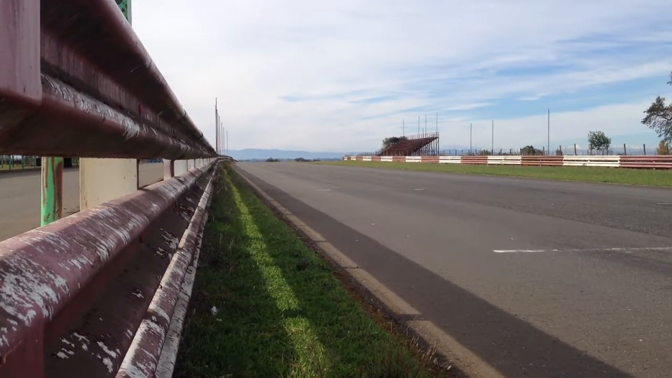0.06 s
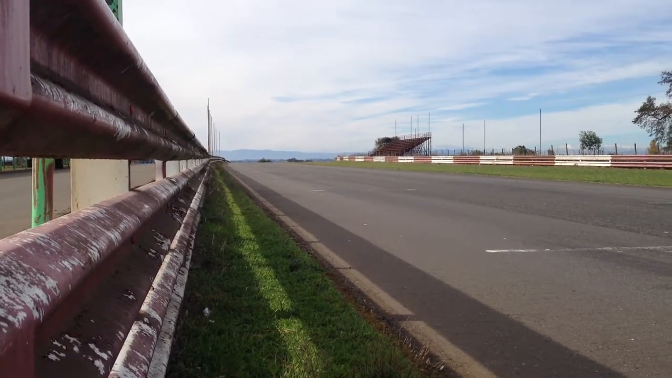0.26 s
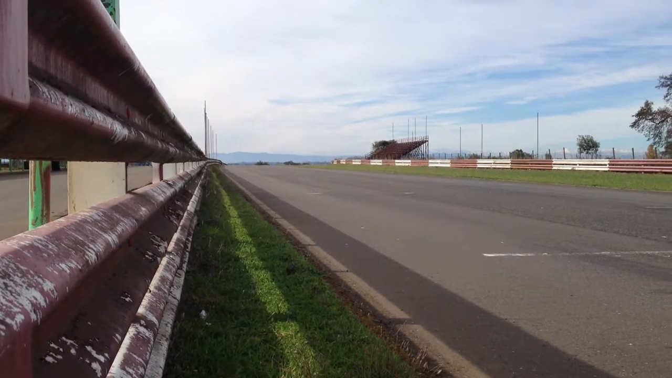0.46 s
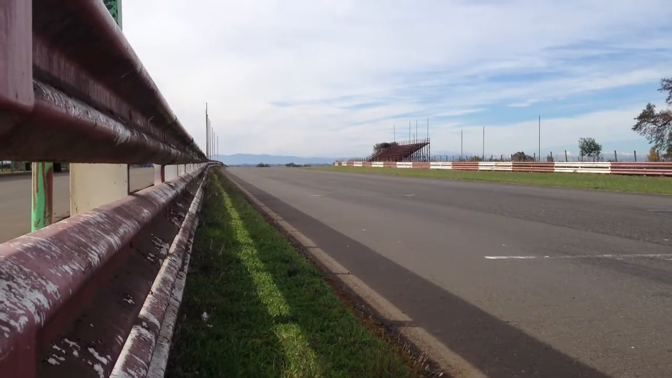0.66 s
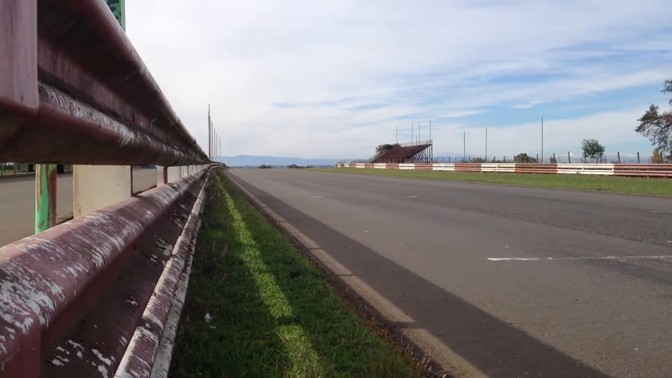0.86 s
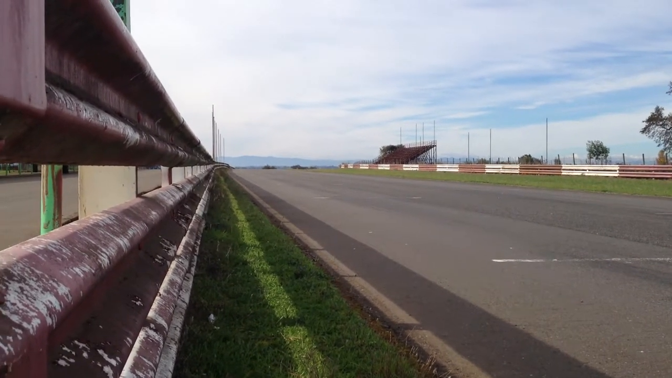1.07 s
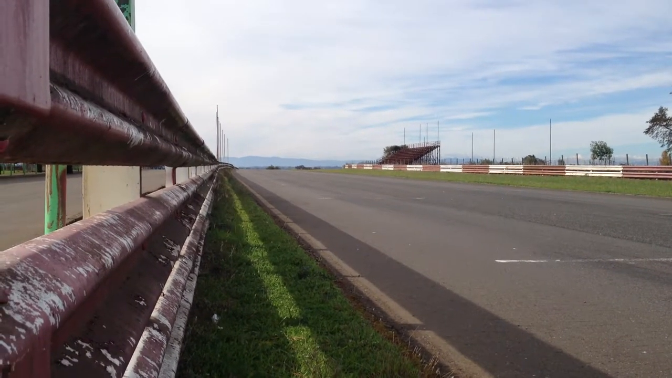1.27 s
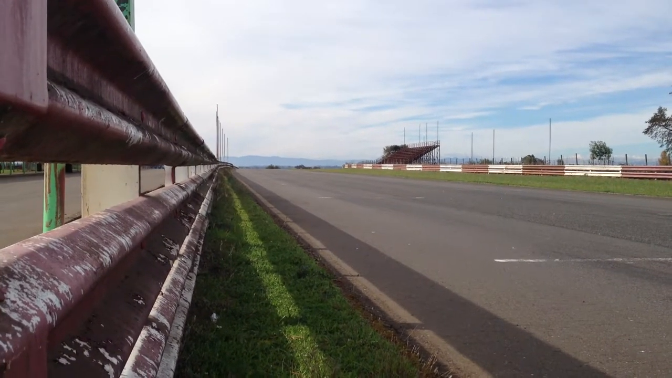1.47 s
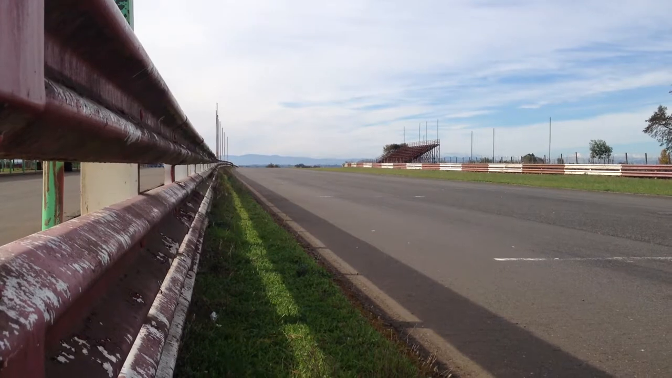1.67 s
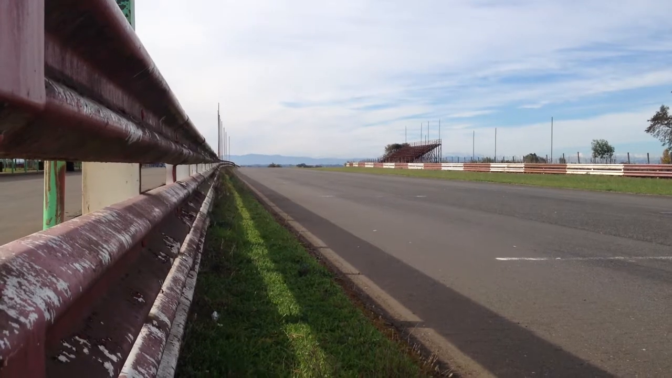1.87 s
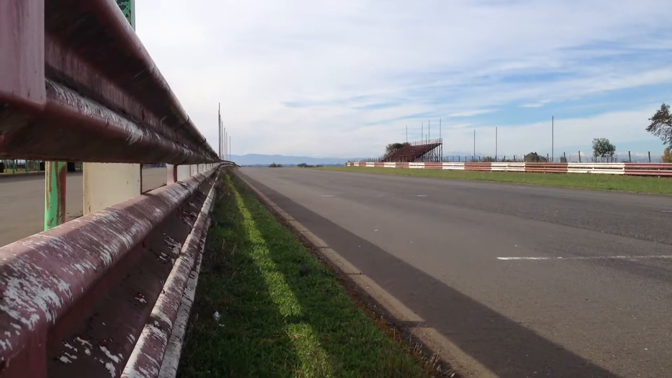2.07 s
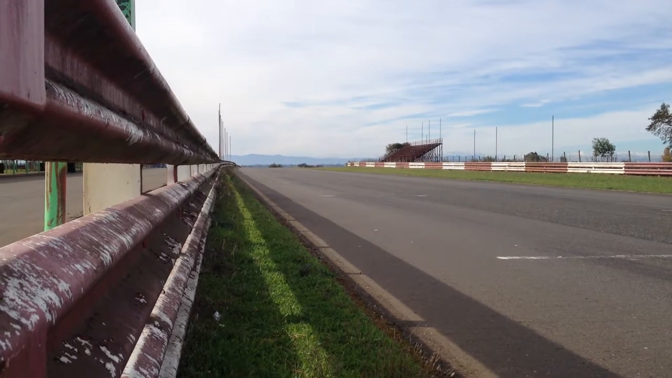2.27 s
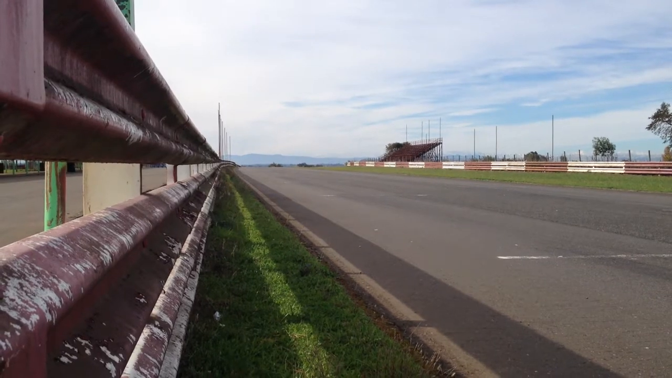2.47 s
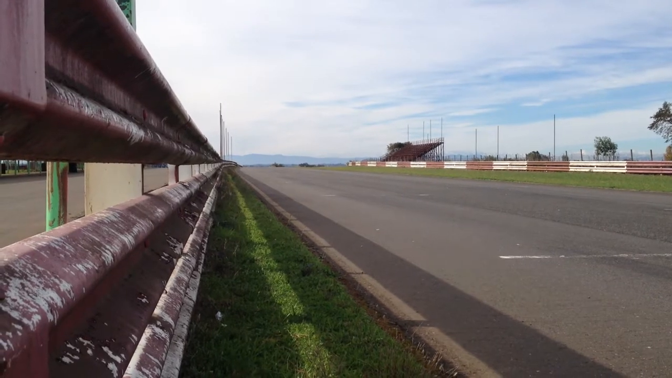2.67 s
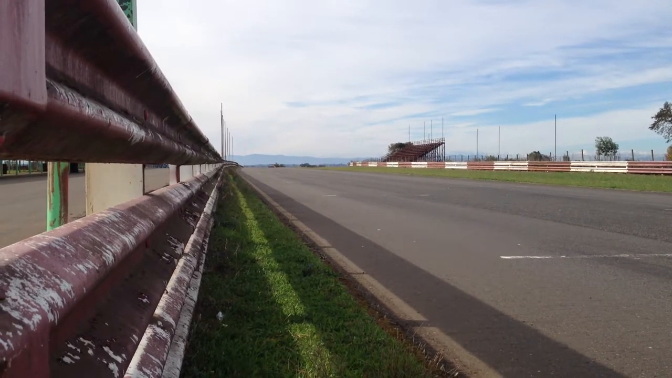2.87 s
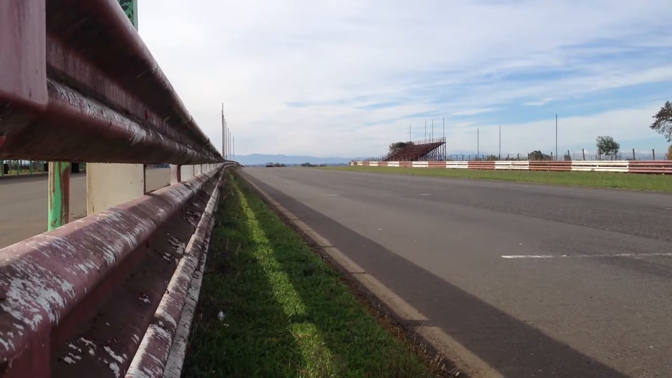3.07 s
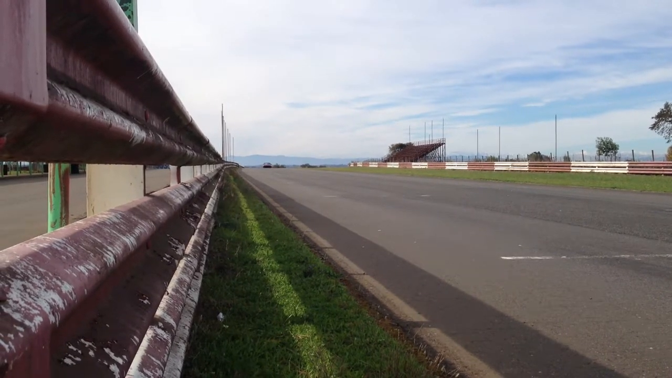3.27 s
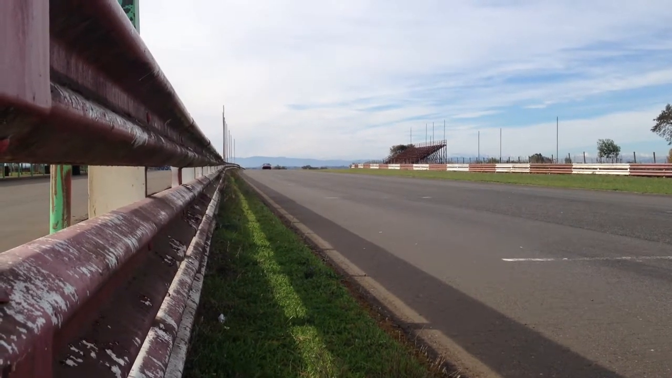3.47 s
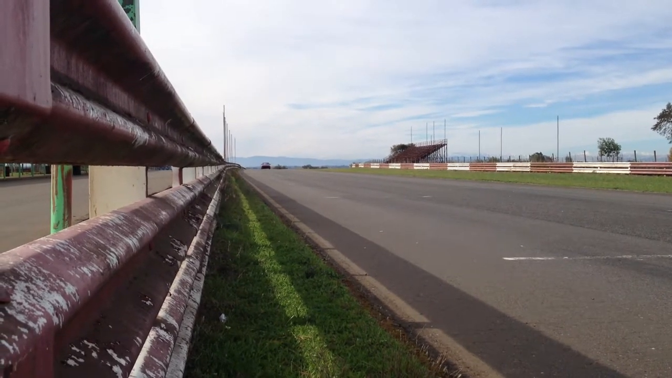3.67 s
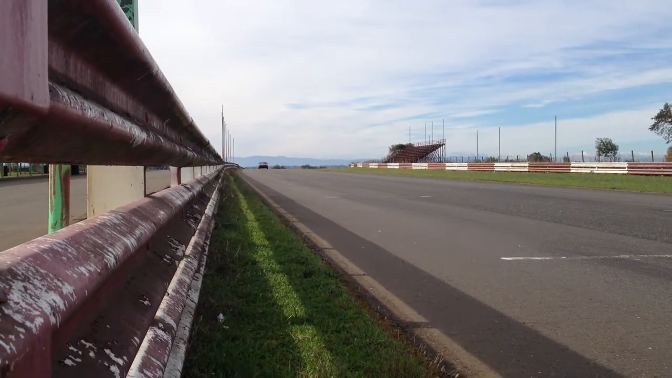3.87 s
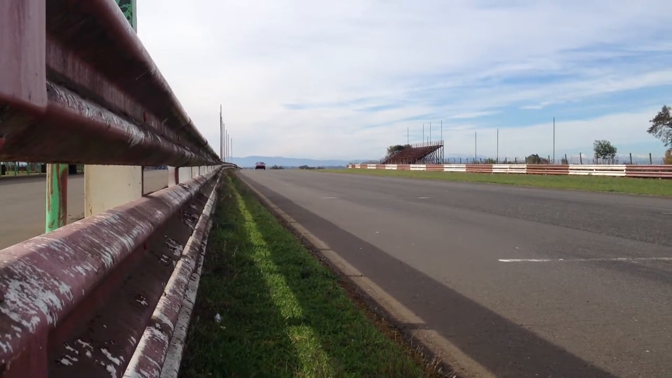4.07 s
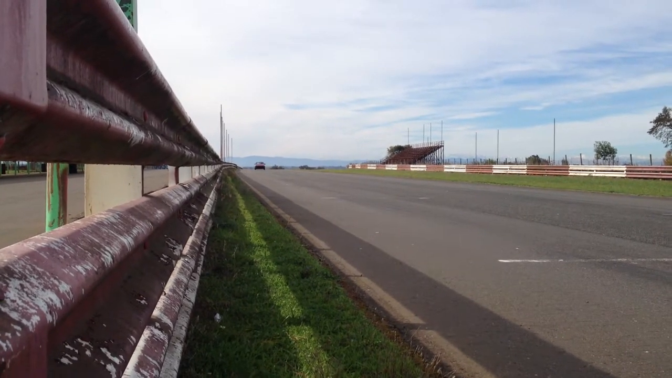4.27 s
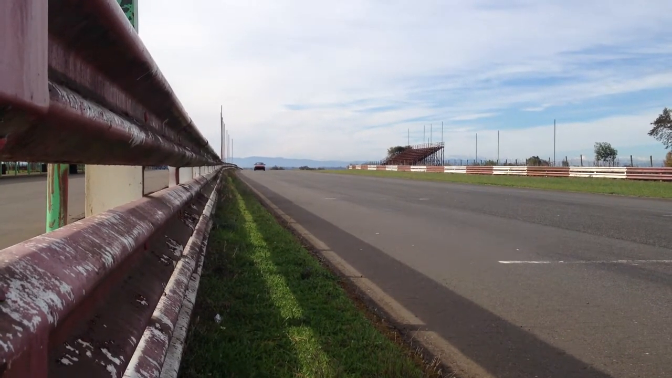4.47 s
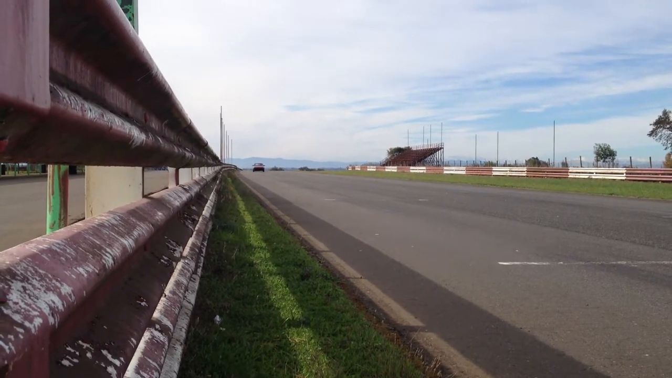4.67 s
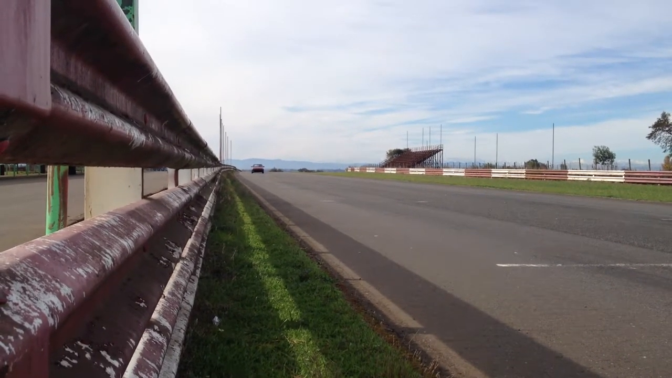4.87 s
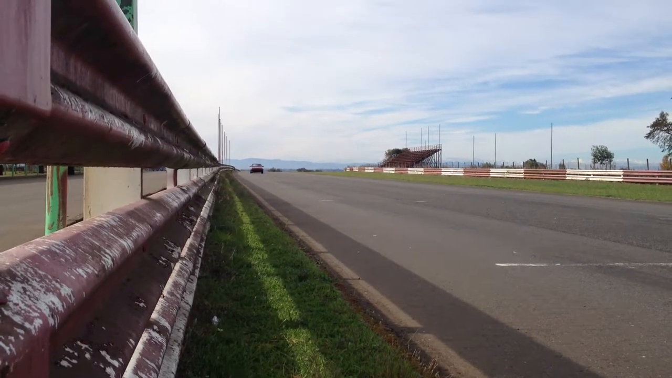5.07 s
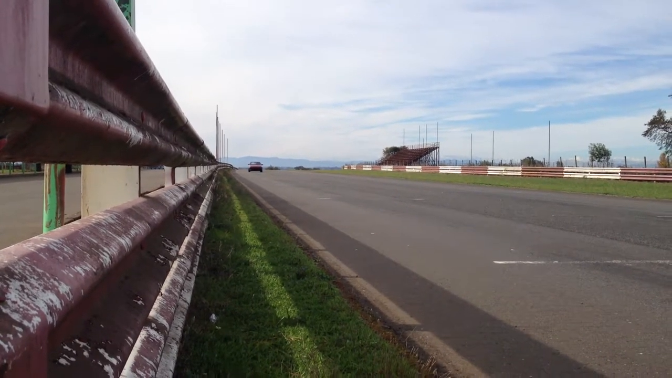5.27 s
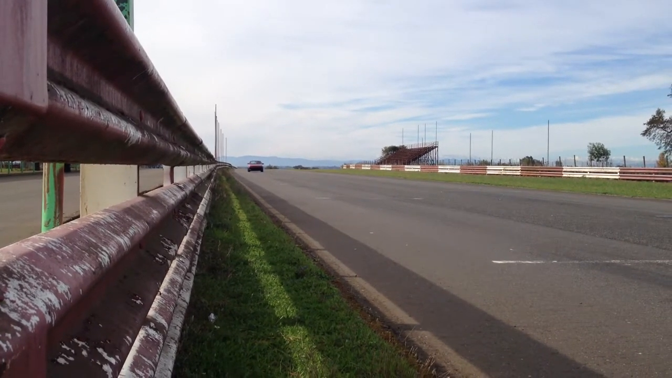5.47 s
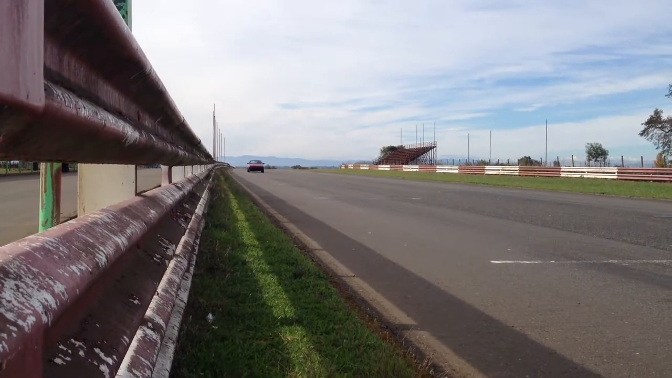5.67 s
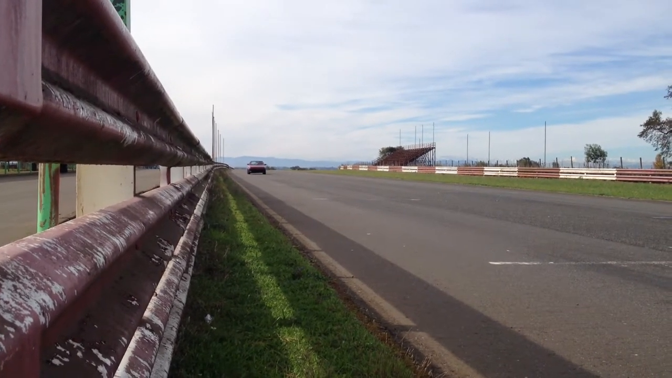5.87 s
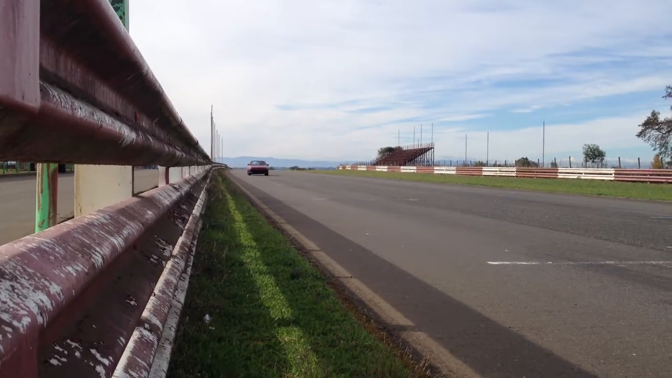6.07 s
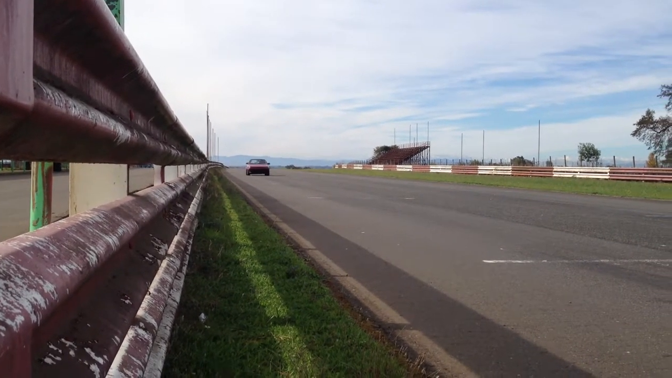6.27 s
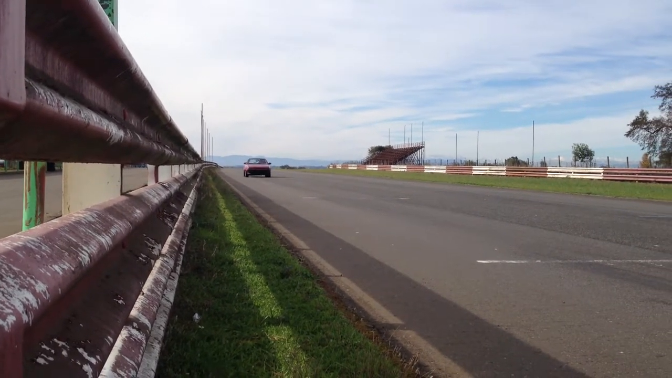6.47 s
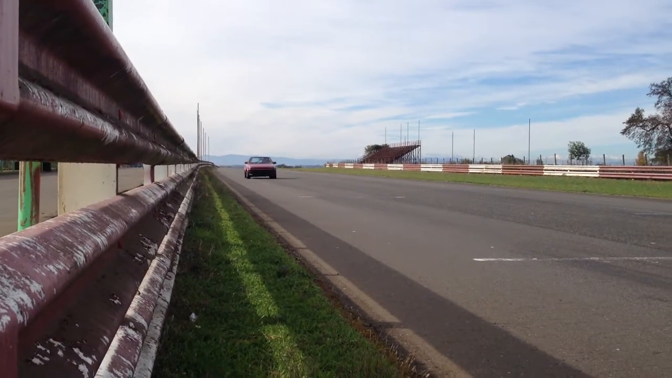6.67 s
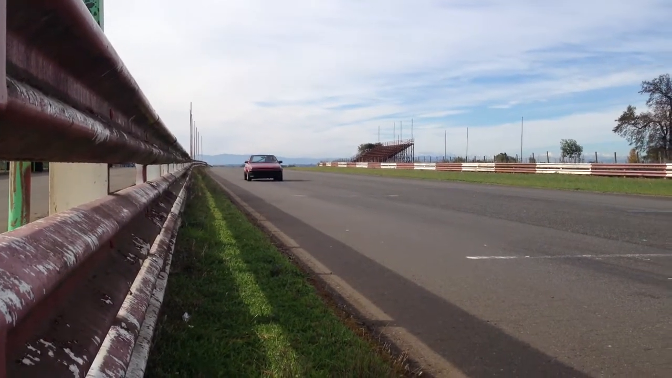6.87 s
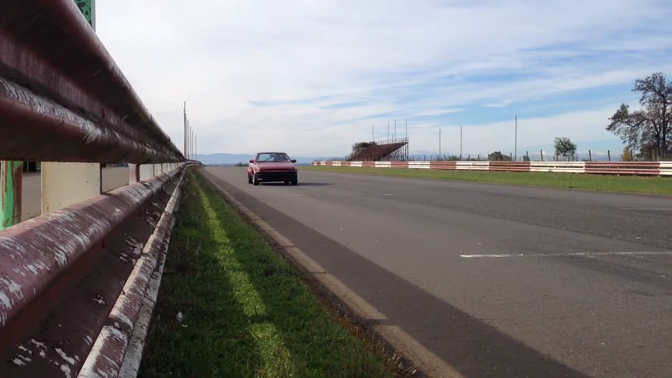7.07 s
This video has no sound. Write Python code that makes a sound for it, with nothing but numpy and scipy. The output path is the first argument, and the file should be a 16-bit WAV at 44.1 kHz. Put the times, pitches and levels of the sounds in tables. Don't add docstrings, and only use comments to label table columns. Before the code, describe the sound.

Outdoors beside a straight road, a small roadside camera picks up faint wind, distant traffic and light hiss. From 0 s a far four-cylinder engine is already at full throttle, a thin, buzzing drone wavering slightly around 0.6 s and rising in pitch. At about 1.9 s the throttle shuts: the tone thins and falls, with soft pops in the pipe, the strongest near 2.2 s. By 2.3 s power returns and the revs settle about a third lower by 2.5 s, with a faint last pop. From 2.6 s it pulls hard, rasping and ringing, pitch creeping upward. Between 3 and 5 s it swells steadily, with gas rush and whistling edges. From 5 to 7.1 s it grows much louder, throbbing unevenly with echoes, with brighter fizz. Dull microphone knocks come from 6.5 s, hardest near 7.1 s, ending still approaching, before any pass.

```python
import sys
import numpy as np
from scipy import signal
from scipy.fft import rfft, irfft, next_fast_len
from scipy.io import wavfile
from scipy.ndimage import uniform_filter1d, map_coordinates

SR = 44100
rng = np.random.default_rng(int(sys.argv[2]) if len(sys.argv) > 2 else 0)


def attenuation_scalar(level_db):
    decades = np.asarray(level_db, float) / 20
    return 10 ** decades


def transcribe(signal):
    frames = np.atleast_2d(signal).T
    limited = np.clip(frames, -1, 1)
    pcm = np.round(limited * 32767).astype(np.int16)
    wavfile.write(sys.argv[1], SR, pcm)


N = 314433

PASS_S = 8.11
SHUT_S, OPEN_S = 1.86, 2.26
# (time [s], firing order level [dB], bite of the exhaust [dB])
APPROACH = [(0, -40.5, -25.5), (.6, -41.5, -22), (1.0, -40, -23), (1.75, -39.5, -20.5), (2.3, -40.5, -18.5),
            (2.65, -38.5, -13.5), (3.0, -34.5, -16), (3.4, -33, -15.5), (4.0, -30.5, -16),
            (4.3, -30, -16.5), (4.7, -29, -16), (5.1, -26, -19), (5.5, -23.5, -18), (5.9, -20.5, -16),
            (6.3, -17.5, -16.5), (6.7, -14.5, -13.5), (7.0, -12, -12.5), (7.13, -11.5, -15)]


def unit(x):
    return x / np.sqrt(np.mean(x ** 2) + 1e-20)


def steady(x):
    power = uniform_filter1d(uniform_filter1d(x ** 2, SR // 6), SR // 6)
    return x / np.sqrt(np.abs(power) + 1e-20)


def curves(rows):
    s, *cols = np.transpose(rows)
    return [np.interp(np.arange(N) / SR, s, c) for c in cols]


def wobble(rate):
    coarse = np.arange(0, N + 32, 32)
    knots = rng.standard_normal(int(N * rate / SR) + 4)
    return np.interp(np.arange(N), coarse, map_coordinates(knots, [coarse * rate / SR]))


def wave(rad):
    return np.cos((rad - 2 * np.pi * np.floor(rad / (2 * np.pi))).astype(np.float32))


def coloured(x, points):
    m = next_fast_len(N + 8192)
    hz, db = np.transpose(points)
    gain = attenuation_scalar(np.interp(np.log(np.fft.rfftfreq(4096, 1 / SR) + 1), np.log(hz + 1), db))
    cepstrum = irfft(np.log(gain + 1e-5))
    cepstrum[1:2048] *= 2
    cepstrum[2049:] = 0
    impulse = irfft(np.exp(rfft(cepstrum)))
    return irfft(rfft(x, m) * rfft(impulse, m), m)[:N]


def resonant(x, modes, low_hz, high_hz, smear):
    m = next_fast_len(N + 8192)
    f = np.fft.rfftfreq(m, 1 / SR)
    power = sum(attenuation_scalar(2 * db) / (1 + (2 * (f - hz) / width) ** 2) for hz, width, db in modes)
    power /= (1 + (low_hz / (f + 1)) ** 24) * (1 + (f / high_hz) ** 40)
    bands = np.arange(0, SR, 130)
    delay = smear * np.interp(f, bands, rng.random(len(bands)))
    phase = -2 * np.pi * np.cumsum(delay) * f[1]
    return irfft(rfft(x, m) * np.sqrt(power) * np.exp(1j * phase), m)[:N]


def scintillate(x, patchy_db, wide, long):
    z = signal.stft(x, nperseg=1024, noverlap=512)[2]
    patches = rng.standard_normal(z.shape)
    for _ in range(2):
        patches = uniform_filter1d(uniform_filter1d(patches, wide, 0), long, 1)
    return signal.istft(z * attenuation_scalar(patchy_db * unit(patches)), nperseg=1024, noverlap=512)[1][:N]


def surge():
    start_s, length_s, period_s = .615, .42, .255
    t = np.arange(N) / SR - start_s
    return np.cos(2 * np.pi * t / period_s) * np.exp(-((t - .1) / length_s) ** 4 / 2)


def shade(revs):
    return np.where(np.arange(N) < SHUT_S * SR, np.maximum(revs, 65.5), revs)


def engine():
    # (time [s], cycle rate [Hz])
    cycle_rate = [(0, 63.4), (1.0, 67.84), (1.3, 68.65), (1.6, 69.84), (1.85, 70.96), (1.93, 66.76),
                  (2.06, 63.8), (2.18, 61.6), (2.27, 58.84), (2.36, 54.1), (2.43, 49.6), (2.5, 49),
                  (2.9, 50.1), (3.4, 51.5), (3.8, 52.95), (4.3, 54.24), (4.8, 56.4), (5.2, 57.55),
                  (5.6, 58.94), (5.85, 59.5), (6.2, 61.24), (6.6, 62.5), (7.13, 64.34)]
    revs = curves(cycle_rate)[0] + 1.5 * surge()
    return revs, np.cumsum(revs) / SR


def order_levels(revs, slow_db, loose):
    # (revs [Hz], order 3 [dB], order 5 [dB], order 8 [dB])
    side_orders = [(49, -17, -14, -16), (49.8, -18, -13.5, -15), (54.5, -10.5, -6, -17.5),
                   (56.7, -11, -8.5, -18), (59.5, -13.5, -8, -17), (61.5, -16, -12, -16),
                   (63.2, -19, -17.5, -16), (64.6, -16, -20.5, -23), (67.1, -10.5, -23, -13.5),
                   (74.6, -9, -15, -19)]
    # (revs [Hz], order 7 [dB], order 9 [dB], order 12 [dB], order 16 [dB])
    upper_orders = [(49, -17.5, -37, -31, -22), (51.4, -28, -43, -20.5, -19), (53.8, -25, -39, -23, -20.5),
                    (54.7, -17.5, -38, -17, -21.5), (56.3, -18, -33, -18, -27.5),
                    (58.3, -17, -26, -14.5, -20.5), (59.8, -20.5, -28, -14.5, -24),
                    (61.48, -19, -26.5, -22.5, -37), (63.75, -20, -21.5, -22.5, -28.5),
                    (65.3, -35, -38, -33, -39), (68.7, -24, -45, -40, -33), (69.2, -21, -40, -24, -32),
                    (68, -22.5, -40, -26, -31)]
    # (order [number], level under the firing order [dB])
    weak_orders = [(2, -39)]
    # (time [s], level [dB])
    throttle = [(1.79, 0.5), (1.86, -7.5), (1.92, -0.5), (2.07, -7.5), (2.15, 2.5), (2.19, -10),
                (2.22, 1.5), (2.25, -4.5), (2.28, 3), (2.46, 3), (2.49, -2), (2.52, 4), (2.56, 3)]
    # (time [s], level [dB])
    sway = [(4.9, -0.5), (5.25, -4), (5.4, -1.5), (5.6, -3.5), (5.85, -1), (6.05, -4), (6.16, -2.5),
            (6.25, -3), (6.32, 0), (6.42, -3), (6.5, -1.5), (6.57, -3.5), (6.64, -1), (6.72, -0.5),
            (6.84, -4.5), (6.94, -3), (7.03, -6), (7.07, -4.5), (7.13, -4)]
    shut_db = -15
    shut_times = [SHUT_S - .02, SHUT_S + .023, OPEN_S - .06, OPEN_S + .057]
    closing_db = shut_db * np.interp(np.arange(N) / SR, shut_times, [0, 1, 1, 0])
    level = {}
    for orders, table in (((3, 5, 8), side_orders), ((7, 9, 12, 16), upper_orders)):
        rev_hz, *columns = np.transpose(table)
        for k, db in zip(orders, columns):
            level[k] = slow_db + closing_db + np.interp(shade(revs), rev_hz, db)
    level[8] = level[8] + shut_db * loose / 2 - closing_db
    level[4] = slow_db + curves(throttle)[0] - surge() + curves(sway)[0]
    for k, db in weak_orders:
        level[k] = slow_db + db + 4.1 * wobble(3.6)
    return level


def barrier_echo(k, turn, revs):
    # (order [number], lag at one second away [s], phase [rad])
    paths = [(4, .032, -.48), (4, .068, -2.91), (3, .0339, 2.8), (5, .0358, 2.76), (8, .032, -.77),
             (7, .0333, -.74), (9, .0326, 2.76), (12, .0314, .88)]
    near_db = [-9, -15, -8, -2.5, -4.5, -5, -6, -15]
    grows_db = [-4, -4.5, -2, -3, 1.1, -.5, -.7, 2]
    away_s = PASS_S - np.arange(N) / SR
    echo = 0
    for (order, near_s, rad), near, grows in zip(paths, near_db, grows_db):
        if order == k:
            lag_s = near_s / away_s - .008
            echo = echo + attenuation_scalar(near + grows * (away_s - .5)) * wave(turn - 2 * np.pi * k * lag_s * revs + rad)
    return echo * np.interp(np.arange(N) / SR, [SHUT_S, OPEN_S], [.048, 1])


def drone(cycles, revs):
    # (frequency [Hz], density [dB per Hz])
    road = [(60, -26.5), (100, -15), (150, 1.5), (250, 3), (400, -3), (700, -6), (1000, -48)]
    slow_db, bite_db = curves(APPROACH)
    loose = np.interp(np.arange(N) / SR, [SHUT_S - .02, SHUT_S + .02, OPEN_S, OPEN_S + .2], [0, 1, 1, 0])
    tone = 0
    for k, db in order_levels(revs, slow_db, loose).items():
        jitter = .21 * (1 + 5 * loose * (k != 4)) * wobble(30)
        turn = 2 * np.pi * k * cycles + jitter + (k % 4 > 0) * rng.uniform(0, 2 * np.pi)
        flutter_db = .89 * (1 + 1.9 * (k > 5)) * wobble(30)
        tone = tone + np.sqrt(2) * attenuation_scalar(db + flutter_db) * (wave(turn) + barrier_echo(k, turn, revs))
    rumble = attenuation_scalar(slow_db - 20.5) * unit(coloured(rng.standard_normal(N), road))
    return tone + rumble + attenuation_scalar(slow_db + .033 * (bite_db + 11)) * singing(cycles, revs)


def singing(cycles, revs):
    # (order [number], level under the firing order [dB])
    singers = [(35, -39)]
    # (frequency [Hz], width [Hz], level [dB])
    sing_in = [(1626, 38, -5), (1670, 35, 8.5), (1860, 50, 1), (2200, 45, 8), (2360, 330, 0.5)]
    # (revs [Hz], orders 6, 10, 11, 13, 14, 15 [dB])
    growl = [(49.4, -36, -26, -29, -37, -32, -29), (49.7, -36, -38, -39, -40, -30, -23),
             (52, -36, -28, -30, -38, -26, -27), (53.3, -40, -37, -30, -24, -23, -29),
             (54.2, -40, -39, -35, -16.5, -28, -29), (56.1, -36, -26, -33, -26, -27, -28),
             (56.76, -32, -29, -27.5, -27, -27, -36), (58.75, -32, -29.5, -23.5, -30.5, -28, -33),
             (60.6, -31, -37, -26, -35, -30, -30), (60.4, -27, -30, -17, -35, -30, -35),
             (61.8, -27, -31, -23, -42, -33, -38), (62.5, -25, -34, -26, -44, -44, -45),
             (64.6, -27, -38, -34.5, -35, -45, -43), (63, -36, -45, -45, -44, -42, -36),
             (69.1, -30, -49, -45, -39, -38, -35), (70.5, -33, -33, -35, -34, -32, -32)]
    # (revs [Hz], orders 17, 18, 19, 20, 22, 24, 26, 28 [dB])
    howl = [(49.47, -36, -36, -40, -27, -40, -30, -43, -22),
            (50.4, -37, -40, -39, -25, -45, -45, -39, -14.5),
            (51.95, -35, -40, -39, -34, -40, -35.5, -37.5, -23),
            (53.76, -35, -36, -46, -29, -31, -28, -33, -23),
            (53.4, -35, -38, -39, -21.5, -39, -40, -47, -29),
            (55.6, -29, -39, -39, -19.5, -38, -30, -50, -48),
            (57.2, -32, -46, -27.5, -23, -35, -24, -31.5, -40),
            (58.7, -31, -36, -28, -29, -36, -39, -33, -39),
            (60, -33, -32, -34.5, -41.5, -40.5, -41, -39, -32),
            (61.75, -33, -26, -37, -36, -30, -31, -39, -20),
            (62.4, -25, -30, -38, -42, -33, -19.5, -24, -17),
            (63.8, -26, -34, -31, -22, -24, -24.5, -28, -30.5),
            (65.1, -41, -40, -41, -37, -38, -36, -36, -38),
            (68.4, -41, -44, -42, -29.5, -40, -36, -38, -38),
            (68.1, -41, -40, -36, -22.5, -38, -29, -40, -36),
            (68.8, -41, -45, -37, -45, -40, -35, -40, -44),
            (70.3, -37, -42, -39, -29, -41, -28.5, -34, -44)]
    # (revs [Hz], orders 32, 36, 40, 44, 48 [dB])
    shriek = [(49, -33, -34, -36, -32, -33), (49.5, -25, -38, -37.5, -20.5, -29),
              (49.9, -26, -41, -22, -23, -21), (51, -19, -23, -31, -19, -16),
              (51.78, -24, -27, -32, -33, -21), (51.5, -26, -30, -36, -27, -19),
              (51.88, -27, -35, -26, -21, -25), (52.4, -32, -31.5, -29, -37, -36),
              (54.1, -32, -44, -40, -35, -36), (56.4, -32, -47, -43, -41, -43),
              (57, -34, -41, -46, -44.5, -49), (61.5, -40, -34, -32, -43, -46),
              (64.04, -34, -32, -29.5, -38, -44), (65, -42, -45, -52, -45, -49),
              (70.5, -40, -34, -50, -46, -50), (69.8, -33, -40, -50, -46, -50)]
    t, hz = np.arange(N) / SR, np.arange(0, 4000, 5)
    gain = np.sqrt(sum(attenuation_scalar(2 * db) / (1 + (2 * (hz - centre) / width) ** 4) for centre, width, db in sing_in))
    size = {order: attenuation_scalar(db) * np.interp(order * revs, hz, gain) for order, db in singers}
    coast_times = [SHUT_S - .02, SHUT_S + .02, OPEN_S - .08, OPEN_S + .11]
    coast = attenuation_scalar(-11 * np.interp(t, coast_times, [0, 1, 1, 0]))
    shaded = shade(revs)
    families = (((6, 10, 11, 13, 14, 15), growl), ((17, 18, 19, 20, 22, 24, 26, 28), howl),
                ((32, 36, 40, 44, 48), shriek))
    for orders, table in families:
        rev_hz, *columns = np.transpose(table)
        for order, db in zip(orders, columns):
            size[order] = coast * np.interp(shaded, rev_hz, attenuation_scalar(db))
    beats = [wobble(12) for _ in range(5)]
    swells = [attenuation_scalar(1.8 * np.where(t < SHUT_S, 2.2, 1) * beat) for beat in beats]
    out = np.zeros(N)
    for order, strength in size.items():
        waver = (.3 + order / 90) * beats[(order + 1) % 5]
        line = wave(2 * np.pi * order * cycles + waver + order ** 2)
        out += np.sqrt(2) * strength * swells[order % 5] * line
    return out


def pull():
    labour_db = [-9.5, -5.5, -5.5, -0.5]
    start, top, off, full = labour_db
    times = [0, SHUT_S - .03, SHUT_S + .0305, OPEN_S - .05, OPEN_S + .058]
    return np.interp(np.arange(N) / SR, times, [start, top, off, off, full])


def firing_pulses(cycles):
    # (strength [dB], lateness [firings])
    cylinders = [(0, 0), (-3, .022), (-8, -.014), (-2, .004)]
    firing = np.arange(int(4 * cycles[-1]))
    strength_db, late = np.transpose(cylinders)[:, firing % 4]
    chance = rng.standard_normal((len(firing), 2))
    at = np.interp(firing + late + .003 * chance[:, 0], 4 * cycles + .014 * wobble(20), np.arange(N))
    taps = np.floor(at)[:, None] + np.arange(-7, 9)
    kernel = np.sinc(taps - at[:, None]) * np.hanning(18)[1:-1]
    index = np.clip(taps, 0, N - 1).astype(int).ravel()

    def train(size):
        return np.bincount(index, (kernel * size[:, None]).ravel(), N)

    size = attenuation_scalar(strength_db + .7 * chance[:, 1])
    return train(size), train(size - .65 * size.mean()), train(size ** 1.4)


def exhaust(cycles):
    # (frequency [Hz], width [Hz], level [dB])
    silencer = [(670, 150, 0), (836, 220, -5), (1097, 74, -0.5), (1394, 110, -2), (1550, 100, -1),
                (1730, 60, -6.5), (1727, 200, -2)]
    # (frequency [Hz], width [Hz], level [dB])
    tailpipe = [(1876, 61, -5.5), (2090, 220, -7.5), (2380, 440, -7), (3025, 76, -10), (3680, 380, -11),
                (3930, 260, -9), (4000, 110, -13)]
    # (frequency [Hz], width [Hz], level [dB])
    tip_modes = [(2230, 78, -4), (2320, 140, -1.5), (2430, 110, 2), (2580, 190, -2.5)]
    # (frequency [Hz], width [Hz], level [dB])
    shield_modes = [(3010, 240, -1.5), (3220, 120, -3.5), (3324, 130, 0.5)]
    # (frequency [Hz], width [Hz], level [dB])
    lip_modes = [(4440, 170, -2), (4610, 390, 6), (4845, 110, -5.5)]
    # (frequency [Hz], density [dB per Hz])
    rush_tint = [(5080, -22.5), (5350, 0.5), (6100, -0.5), (7300, -3.5), (8700, -10), (10000, -22),
                 (11500, -27), (14000, -62)]
    # (frequency [Hz], density [dB per Hz])
    fizz_tint = [(5590, -34.5), (9500, -1), (12000, -6), (13100, -11.5), (15200, -12.5)]
    # (time [s], share [0-1])
    ragged_share = [(0, .65), (.8, .55), (1.8, .4), (1.9, .7), (2.45, .6), (2.65, .22), (5, .25),
                    (6.3, .45), (7.13, .62)]
    # (time [s], share [0-1])
    rasp_share = [(0, .75), (1.8, .7), (1.9, .85), (2.45, .75), (2.7, .45), (3.7, .5), (4.5, .75),
                  (6.2, .8), (7.13, .7)]
    # (time [s], tip [dB], shield [dB], rush of air [dB])
    clarity = [(0, -25.5, -35, -2.5), (.6, -28, -32, -2.5), (.95, -19, -30, -2), (1.15, -26, -39, -2.5),
               (1.45, -20.5, -28, -2.5), (1.72, -23, -28, -1), (1.82, -17, -19.5, -2),
               (1.9, -27, -37, -3.5), (2.25, -21, -23, -1), (2.4, -21, -15.5, 1), (2.6, -18.5, -26, 1.5),
               (3.0, -10, -24, 2), (3.12, -11.5, -20.5, 0), (3.4, -9, -18, 1.5), (3.48, -15, -22, 4.5),
               (3.7, -12.5, -29, 2), (3.82, -21, -28, 3), (4.2, -20, -19.5, 3.5), (4.45, -18, -30, 2.5),
               (4.8, -22.5, -25.5, 2), (5.5, -29, -33, 0), (5.72, -26.5, -21.5, 0.5),
               (5.92, -27, -23.5, 0.5), (6.12, -21, -29.5, 3), (6.4, -26.5, -31, -0.5),
               (6.8, -21.5, -25.5, -1), (7.03, -17.5, -26, 1.5), (7.13, -27, -25, -3)]
    # (time [s], level under the firing order [dB])
    whistling = [(0, -47), (.45, -32), (.8, -34), (.95, -30), (1.05, -38), (1.2, -29), (1.35, -36),
                 (1.55, -30), (1.85, -28), (2.05, -39), (2.35, -25), (2.85, -29), (2.95, -23.5),
                 (3.35, -24), (3.45, -18.5), (3.55, -28), (3.8, -30), (4.15, -21), (4.45, -27.5),
                 (4.85, -25.5), (5.35, -30.5), (5.75, -27), (6.1, -26.5), (6.35, -23), (6.55, -24),
                 (6.85, -22), (7.13, -28)]
    level_db, bite_db = curves(APPROACH)
    tip_db, shield_db, rush_db = curves(clarity)
    whistle_db = curves(whistling)[0]
    far = np.log10(PASS_S - np.arange(N) / SR)
    bark_db = level_db - 12 + .22 * bite_db + pull()
    rasp_db = level_db + bite_db - 3.5
    air_db = level_db - 27.5 - 8.5 * far + rush_db + .25 * wobble(7.6)
    fizz_db = level_db - 33 - 46 * far + rush_db + .5 * wobble(14)

    pulses, uneven, sharp = firing_pulses(cycles)
    puff = signal.lfilter([1], [1, -np.exp(-1 / (.0032 * SR))], np.abs(pulses))
    flow = steady(unit(puff) + 1)

    def gas():
        return flow * rng.standard_normal(N)

    def source(share, beat):
        return np.sqrt(1 - share) * steady(beat) + np.sqrt(share) * gas()

    ragged = np.clip(curves(ragged_share)[0], 0, 1)
    bark = resonant(source(ragged, uneven), silencer, 610, 1900, smear=.016)
    bark = steady(scintillate(bark, patchy_db=2.5, wide=2, long=8))
    rasp = resonant(source(curves(rasp_share)[0], pulses), tailpipe, 1820, 4400, smear=.011)
    rasp = steady(scintillate(rasp, patchy_db=2.5, wide=5, long=6))
    tip = steady(resonant(source(ragged / 2, sharp), tip_modes, 2050, 2670, smear=.002))
    buzz = source(ragged ** .5, pulses)
    whistle = steady(resonant(buzz, lip_modes, 4350, 4930, smear=.006))
    shield = steady(resonant(buzz, shield_modes, 2900, 3450, smear=.004))
    air = steady(scintillate(coloured(gas(), rush_tint), patchy_db=2, wide=14, long=4))
    fizz = steady(coloured(gas(), fizz_tint))
    rings = attenuation_scalar(tip_db) * tip + attenuation_scalar(shield_db) * shield + attenuation_scalar(whistle_db) * whistle
    rings = attenuation_scalar(level_db + 1.4 * wobble(13)) * rings
    return rings + attenuation_scalar(bark_db) * bark + attenuation_scalar(rasp_db) * rasp + attenuation_scalar(air_db) * air + attenuation_scalar(fizz_db) * fizz


def pops():
    # (time [s], peak [dB], pitch [Hz])
    thuds = [
        (1.861, -38, 172),
        (2.187, -32, 188),
        (2.475, -44.5, 152),
    ]
    out, t = np.zeros(N), np.arange(SR // 10) / SR
    for s, db, hz in thuds:
        swell = (1 - np.exp(-t / .013)) ** 2
        thud = np.sin(2 * np.pi * hz * t) * attenuation_scalar(db - 60 * t / .066) * swell
        out[round(s * SR):][:len(t)] += 4 * thud
    return out


def open_country():
    # (frequency [Hz], density [dB per Hz])
    far_tint = [(50, -42.5), (90, -12.5), (140, 15), (300, -15.5), (600, -31), (1200, -9.5), (3000, -47.5)]
    return attenuation_scalar(-65) * unit(coloured(rng.standard_normal(N), far_tint))


def dull_thumps():
    # (time [s], peak [dB])
    thumps = [
        (6.505, -56),
        (6.736, -43),
        (6.925, -48),
        (6.955, -46),
        (7.079, -38),
    ]
    t = np.arange(N) / SR
    return sum(attenuation_scalar(db) * np.exp(-((t - s) / .0037) ** 2 / 2) for s, db in thumps)


def amplifier_hiss():
    # (frequency [Hz], density [dB per Hz])
    hiss_tint = [(3000, -38), (5500, -5.5), (8600, -3), (10000, -5.5), (11500, 1.5), (13500, 6.5),
                 (15200, 0)]
    return attenuation_scalar(-77) * unit(coloured(rng.standard_normal(N), hiss_tint))


def scene():
    revs, cycles = engine()
    return (drone(cycles, revs) + exhaust(cycles) + pops() + open_country())[None]


def roll_off(x):
    return signal.sosfilt(signal.butter(12, 15390, fs=SR, output="sos"), x)


def record(dry):
    x = dry + amplifier_hiss()
    x = x / (1 + np.abs(x / .85) ** 6) ** (1 / 6)
    return roll_off(x + dull_thumps())


dry = scene()
out = record(dry)
transcribe(out)
```